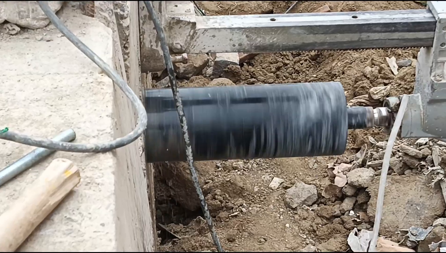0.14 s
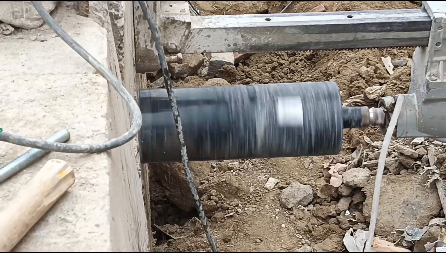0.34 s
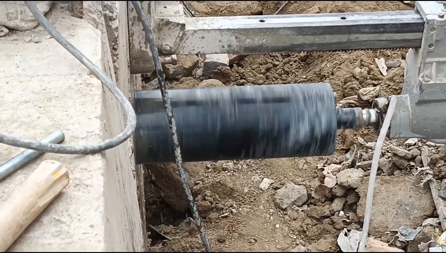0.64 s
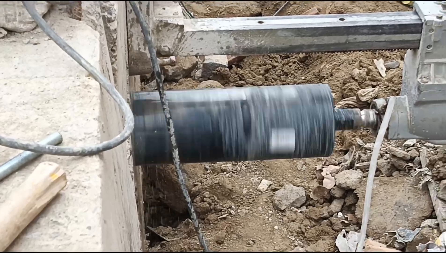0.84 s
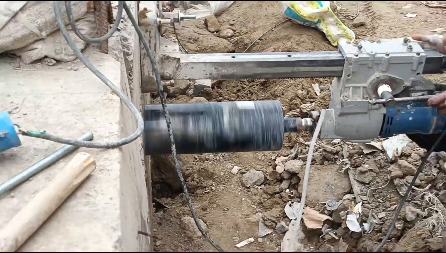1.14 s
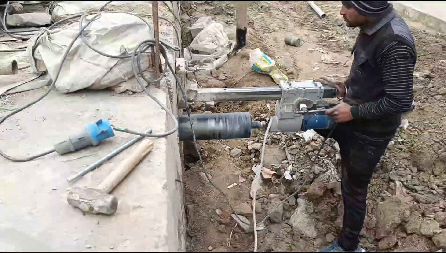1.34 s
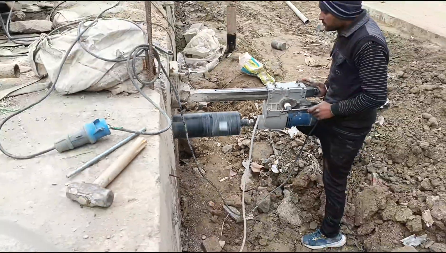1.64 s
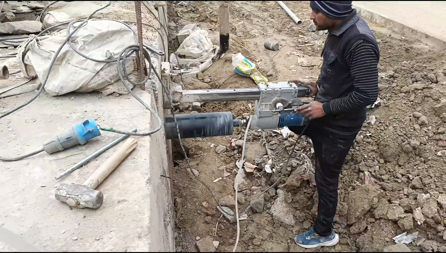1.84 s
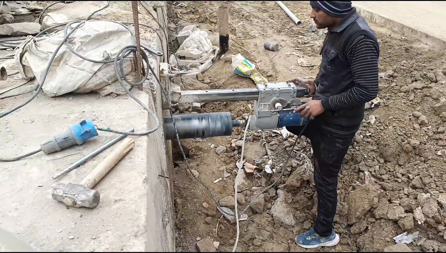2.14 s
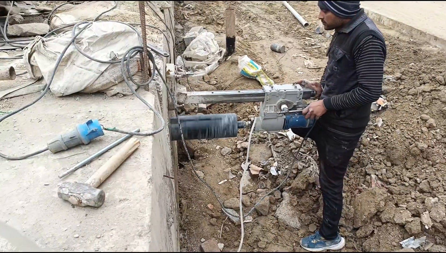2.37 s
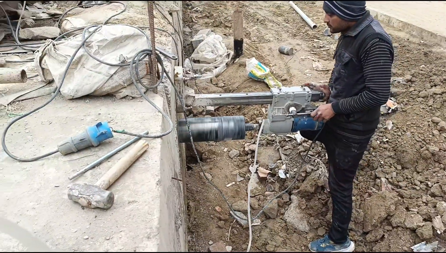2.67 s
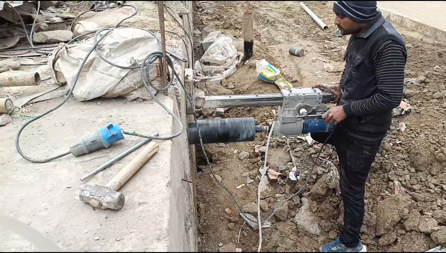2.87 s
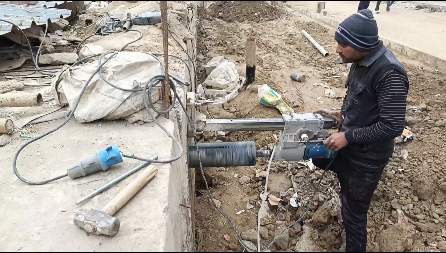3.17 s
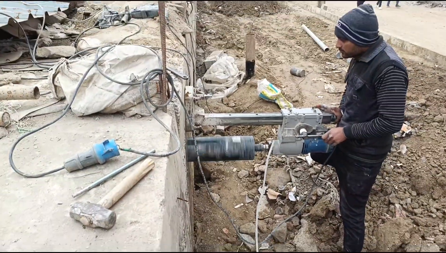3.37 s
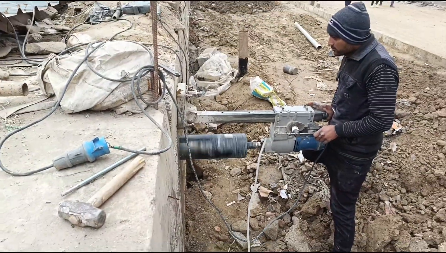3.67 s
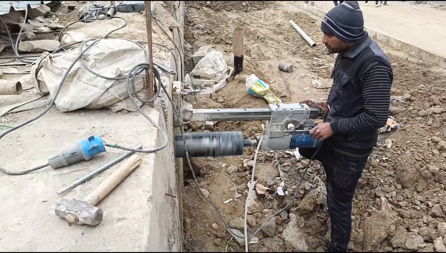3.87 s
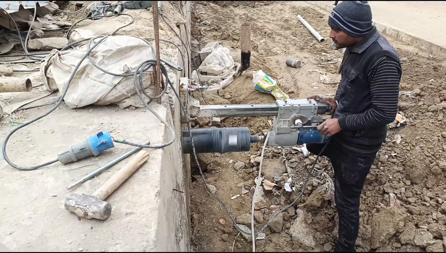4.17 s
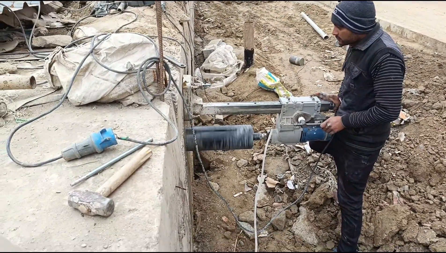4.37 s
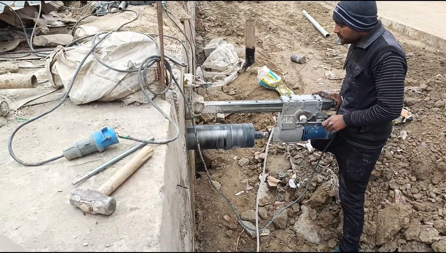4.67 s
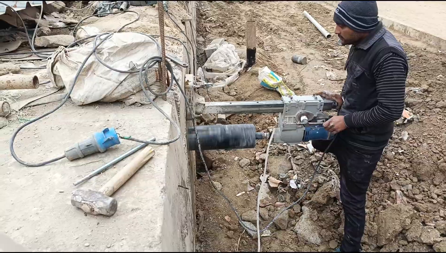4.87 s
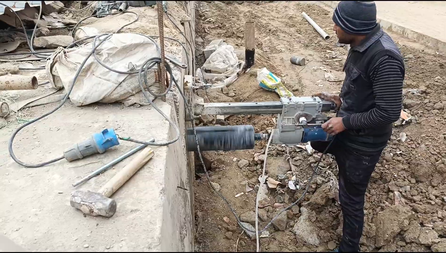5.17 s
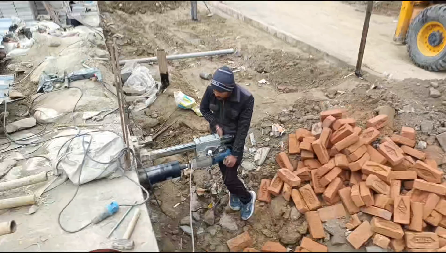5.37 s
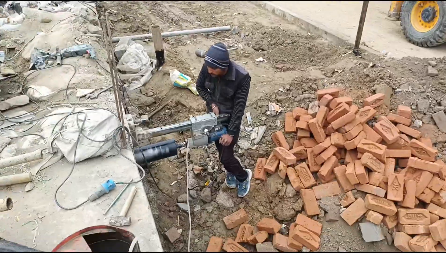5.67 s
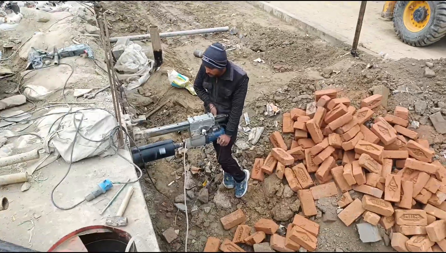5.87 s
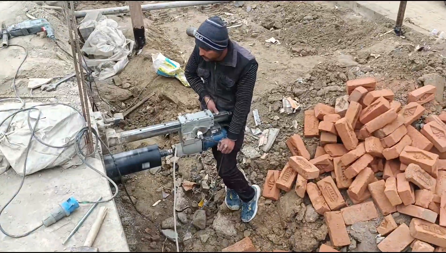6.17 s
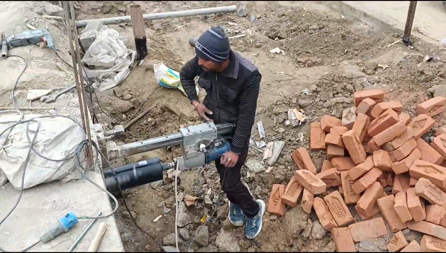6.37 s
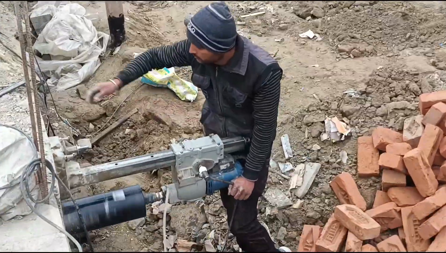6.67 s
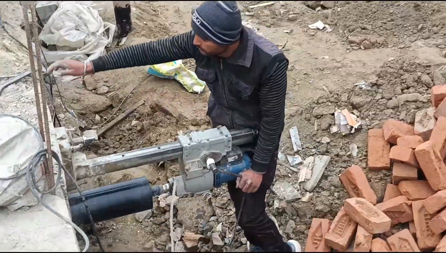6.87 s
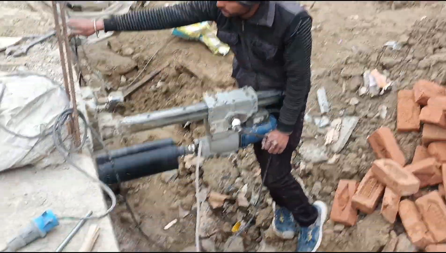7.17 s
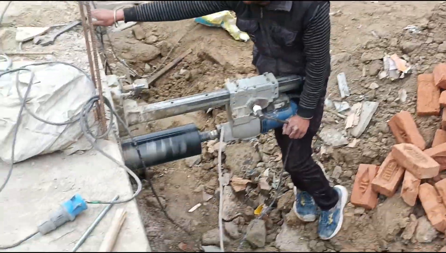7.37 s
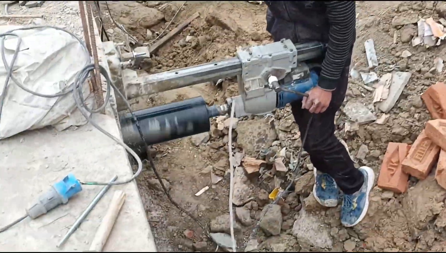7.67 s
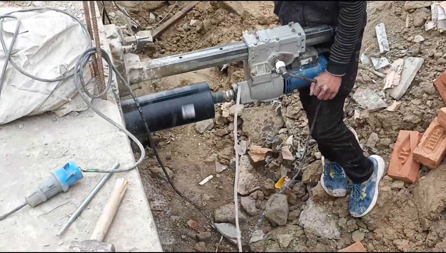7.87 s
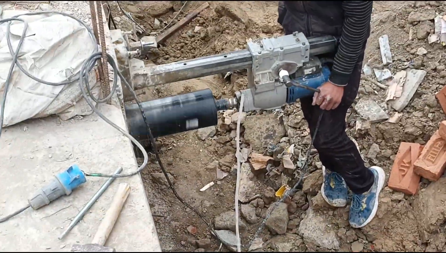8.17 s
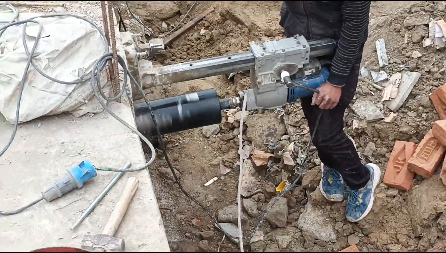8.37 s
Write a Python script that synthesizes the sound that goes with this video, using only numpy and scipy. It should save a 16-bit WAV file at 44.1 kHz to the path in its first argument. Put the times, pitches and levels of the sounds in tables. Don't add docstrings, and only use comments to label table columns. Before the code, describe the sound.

A continuous harsh, hissing grind of a steel barrel in concrete, close and dry in open air, pulsing slightly as it turns. Dull knocks hit the stand, more often toward the end of this part. A brief dropout follows, then the same drill from a more distant microphone position, without knocks, its gears whining while a diesel engine's low throb rises and eases.

```python
import sys
import numpy as np
from scipy import signal
from scipy.io import wavfile
from scipy.ndimage import uniform_filter1d

SR = 44100
rng = np.random.default_rng(int(sys.argv[2]) if len(sys.argv) > 2 else 0)


def materialize(psi):
    bounded = np.clip(np.atleast_2d(psi).T, -1, 1)
    quanta = np.round(bounded * 32767).astype(np.int16)
    wavfile.write(sys.argv[1], SR, quanta)


def boost_factor(decibels):
    exponent = np.asarray(decibels, float) / 20
    return 10 ** exponent


N = 376160

CUT_S, RESUME_S = 5.2715, 5.3355
TIME_S = np.arange(N) / SR
NEAR, FAR = TIME_S < CUT_S, TIME_S >= RESUME_S


def rms_one(x):
    return x / np.sqrt(np.mean(x ** 2) + 1e-20)


def in_time(rows):
    s, *columns = np.transpose(rows)
    return [np.interp(TIME_S, s, column) for column in columns]


def drift(rate):
    step = 40
    r = np.exp(-2 * np.pi * step * rate / SR)
    noise = rng.standard_normal(N // step + 2002)
    slow = signal.lfilter([1], [1, -2 * r, r * r], noise)[2000:]
    return np.interp(np.arange(N) / step, np.arange(len(slow)), rms_one(slow))


def resonate(x, hz, width):
    r = np.exp(-np.pi * width / SR)
    feedback = [1, -2 * r * np.cos(2 * np.pi * hz / SR), r * r]
    return signal.lfilter([(1 - r * r) / 2, 0, (r * r - 1) / 2], feedback, x)


def tone(hz, db, wander_hz, flutter_db):
    phase = 2 * np.pi * np.cumsum(hz + wander_hz * drift(27)) / SR
    return np.sqrt(2) * boost_factor(db + flutter_db * drift(17)) * np.sin(phase)


# start_s, firing_hz, effort_db
LOADER_REVS = [(5.4, 32.4, -34), (5.65, 36.2, -34), (5.9, 41.06, -32), (6.3, 41.7, -33), (6.5, 39.0, -34),
               (6.6, 34.7, -40), (6.7, 38.27, -26), (6.85, 40.4, -30), (7.0, 43.9, -26), (7.3, 46.1, -23.5),
               (7.6, 46.3, -29), (8.0, 46.3, -34), (8.45, 45.5, -36)]
# pitch_hz, level_db
EXHAUST_PIPE = [(45, -23), (63, -12), (73, 6.5), (83, -10), (95, 2.5), (136, -11), (164, 2), (186, -12)]


def loader():
    firing_hz, effort_db = in_time(LOADER_REVS)
    pipe_hz, pipe_db = np.transpose(EXHAUST_PIPE)
    engine = 0
    for multiple in (1, 2, 3, 4):
        hz = multiple * firing_hz
        passed_db = np.interp(np.log(hz), np.log(pipe_hz), pipe_db)
        engine = engine + tone(hz, effort_db + passed_db, wander_hz=0.7, flutter_db=1.8)
    return engine


# start_s, commutator_hz, level_db
NEAR_WHINE = [(.0, 12870, -45), (.29, 12930, -46), (.33, 13390, -54), (.66, 13316, -35), (.8, 13149, -33.5),
              (1.1, 13047, -31), (1.6, 12915, -36), (2.05, 12862, -39), (2.4, 12980, -41),
              (2.75, 13121, -35), (3.08, 13080, -35), (3.3, 13070, -49), (3.8, 13066, -48),
              (3.95, 13064, -38.5), (4.3, 13035, -43), (4.6, 12961, -38.5), (5.2, 12930, -37.5)]
# start_s, gear_mesh_hz, mesh_db, commutator_db
FAR_WHINE = [
    (5.5, 994, -30.5, -70),
    (5.92, 982, -29, -64),
    (6.08, 987, -25.5, -70),
    (6.35, 1000, -30, -72),
    (6.55, 1012, -29, -55),
    (6.95, 1023, -35.5, -58),
    (7.4, 1022, -32.5, -51),
    (7.8, 1018, -35.5, -55),
    (8.02, 1009, -24, -57),
    (8.3, 1005, -31, -64),
]
BARS_PER_TOOTH = 10.97


def motor():
    bar_hz, bar_db = in_time(NEAR_WHINE)
    mesh_hz, mesh_db, far_bar_db = in_time(FAR_WHINE)
    close = tone(bar_hz, bar_db, wander_hz=8.0, flutter_db=2.5)
    far = tone(mesh_hz, mesh_db, wander_hz=4.5, flutter_db=2.2)
    far += tone(BARS_PER_TOOTH * mesh_hz, far_bar_db + 1, wander_hz=30.0, flutter_db=2.2)
    return np.where(NEAR, close, far)


def speed(rows):
    hz = in_time(rows)[0]
    return 100 * (hz / np.mean(np.array(rows)[:, 1]) - 1)


# start_s, peak_db
KNOCK_TIMES = [(0.642, -19), (0.923, -19), (1.289, -24), (1.719, -38), (2.053, -31), (2.187, -30),
               (2.438, -19), (2.571, -40), (2.646, -29), (2.776, -13.5), (2.969, -45), (3.368, -32),
               (3.537, -24), (3.679, -16), (3.817, -30), (3.929, -32), (4.063, -19), (4.189, -18.5),
               (4.319, -19), (4.469, -15), (4.619, -21), (4.86, -20), (4.988, -20), (5.131, -15.5),
               (5.258, -17.5)]
# pitch_hz, width_hz, level_db
STAND_MODES = [
    (191, 44, 0.4),
    (390, 66, 0.1),
    (574, 90, -1.5),
    (865, 170, -2),
    (1130, 80, -9.0),
]


def stand_ring(x):
    ringing = 0
    for hz, width, db in STAND_MODES:
        twice = resonate(resonate(x, hz, width), hz, 2 * width)
        ringing = ringing + boost_factor(db) * twice / np.sqrt(width)
    return ringing


def knocks(rise_s=0.0021, fall_s=0.012, level_db=-3.5):
    t = np.arange(SR // 4) / SR
    shove = (1 - np.exp(-t / rise_s)) * np.exp(-t / fall_s)
    marks = np.zeros(N)
    marks[[round(s * SR) for s, db in KNOCK_TIMES]] = boost_factor(np.array(KNOCK_TIMES)[:, 1] + level_db)
    rough = rng.standard_normal(N)
    scrape = 0.53 * rough * signal.fftconvolve(marks, shove / shove.max())[:N]
    contact = 14 * np.roll(marks, round(rise_s * SR))
    return stand_ring(scrape + contact) / np.std(stand_ring(rough))


def bites(db_per_db=0.14, lasts_s=0.019):
    t = np.arange(0, N, 40) / SR
    s, db = np.transpose(KNOCK_TIMES)
    strength = np.clip(db + 23.5, 0, None)
    surge = strength @ np.exp(-((t - s[:, None]) / lasts_s) ** 2)
    return db_per_db * np.interp(TIME_S, t, surge)


CONTROL_PITCHES = [80, 400, 1800, 5000, 9000, 14000]
GROUP_PITCHES = [400, 1100, 2500, 3900, 5300, 9000]
TURNS_PER_S = 7.6
BUMP_S, BUMP_LASTS_S, BUMP_DB = 2.975, 0.035, 18


def grinding(part, cut, answers, colour, hiss, modes, rings, scrape_db, hiss_db, patchy_db, wobble_db):
    feed_waver_db = 0.71
    grit_db = (in_time(cut)[0] + bites() + feed_waver_db * drift(1.67))[part]
    bite = grit_db - uniform_filter1d(grit_db, size=SR // 4)
    site, stand, body, grit_shift, fan, brush, *reach = answers[:, part] + 1.38 * bite
    site = site + 2.5 * drift(4.0)[part]
    site = site + BUMP_DB * np.exp(-((TIME_S[part] - BUMP_S) / BUMP_LASTS_S) ** 2)
    stand = stand + 1.7 * drift(9)[part]
    grit_level = grit_db - np.mean(grit_db) + grit_shift - 1.44 * bite
    levels = np.array([site, stand, body, grit_level, fan, brush])
    groups = np.array([stand, *reach, fan])
    turn = 2 * np.pi * np.cumsum(TURNS_PER_S + 0.72 * drift(0.96))[part] / SR
    pressure = boost_factor(0.45 * drift(54)[part])
    grit = rng.standard_normal((4, N))[:, part] * pressure

    def swell(hz, centres_hz=CONTROL_PITCHES, levels=levels):
        share = np.array([np.interp(np.log(hz), np.log(centres_hz), row) for row in np.eye(6)])
        once = np.cos(turn + rng.uniform(0, 0.5))
        twice = 1.37 * np.cos(2 * turn + rng.uniform(0, 4.7))
        patches = (0.6 * drift(1.66) + 0.84 * drift(22.7))[part]
        return share @ levels + wobble_db * (once + twice) + patchy_db * patches

    def banded(spectrum, edges):
        hz_points, db_points = np.transpose(spectrum)
        out = 0
        for k, (low, high) in enumerate(zip(edges, edges[1:])):
            hz = np.sqrt(low * high)
            band_filter = signal.butter(2, [low, high], "band", fs=SR, output="sos")
            band = signal.sosfilt(band_filter, grit[k % 2])
            db = np.interp(np.log(hz), np.log(hz_points), db_points)
            out = out + band * boost_factor(db + swell(hz))
        return rms_one(out)

    scrape = banded(colour, np.r_[np.geomspace(30, 950, 18), np.geomspace(1000, 7600, 36)])
    scrape = signal.sosfilt(signal.butter(4, 8000, fs=SR, output="sos"), scrape)
    air = banded(hiss, np.geomspace(7600, 16500, 18))
    ground_echo = 0.22 * np.roll(air, round(0.0031 * SR))
    air = air + ground_echo
    air = air + 0.2 * (np.roll(air - ground_echo, round(0.0073 * SR)))
    barrel = 0
    for k, (hz, width, db) in enumerate(sorted(modes + rings)):
        ring = resonate(resonate(grit[2 + k % 2], hz, width), hz, 4 * width)
        listener_shift = 1.4 * drift(5.0)[part]
        barrel = barrel + rms_one(ring) * boost_factor(db + swell(hz, GROUP_PITCHES, groups) + listener_shift)
    out = np.zeros(N)
    out[part] = boost_factor(np.mean(grit_db)) * (boost_factor(scrape_db) * scrape + barrel) + boost_factor(hiss_db) * air
    return out


# start_s, grit_db, angle (-1 side-on to 1 end-on)
FAR_FEED = [
    (5.56, -17.5, .2),
    (6.2, -18, 0.17),
    (6.6, -17.5, -0.67),
    (7.2, -20, 0.27),
    (7.6, -17, .2),
    (8.1, -15.5, 0.6),
    (8.53, -20, -0.7),
]
# pitch_hz, level_db per Hz
FAR_AIR = [(4470, -30), (7600, 8.5), (8230, 7), (10600, -13.5), (11000, -12), (11900, -22), (13600, -5),
           (14800, -8), (15400, 4.5)]
# pitch_hz, level_db per Hz
FAR_SCRAPE = [(40, -44), (81, -10.5), (227, -9), (419, -14), (694, -9), (1150, -8.5), (1990, -2.5),
              (2890, -5.5), (3900, -5), (4600, -5.5), (5200, -1.5), (6100, -1), (6900, -4.5), (7700, -15)]
# pitch_hz, width_hz, level_db relative to the grit
FAR_HOUSING = [(223.5, 52, -14.5), (529, 35, -17.5), (1995, 54, -22), (2370, 240, -22.5), (2367, 37, -16.5),
               (3926, 235, -8), (6040, 85, -52)]
# pitch_hz,
# width_hz, level_db relative to the grit
FAR_BARREL = [(985, 70, -15), (1220, 40, -25), (1630, 35, -20), (1785, 40, -19), (2654, 16, -21),
              (4100, 40, -20), (4260, 50, -21), (5185, 9, -19), (5315, 9, -24), (5272, 9, -22),
              (6369, 9, -23), (6790, 14, -26), (6890, 10, -25), (8733, 14, -40), (11410, 14, -50)]
# speed_db per % of motor speed, gain_db while gain is down, angle_db end-on
FAR_LAYERS = [
    (-1.5, -12, 4),
    (0.39, -10, .1),
    (0.37, -8.5, 0.3),
    (-0.79, -21.5, -2.2),
    (1.1, -11, 2),
    (1.4, -3, .1),
    (1.5, -11, .9),
    (2.1, -15, -9),
    (0.29, -12, -0.5),
    (0.89, -16, -13),
]


def far_grinding():
    recover_s = 0.19
    gain_down = np.clip(1 - (TIME_S - RESUME_S) / recover_s, 0, 1)
    answers = np.array(FAR_LAYERS) @ [speed(FAR_WHINE), gain_down, in_time(FAR_FEED)[1]]
    return grinding(FAR, FAR_FEED, answers, FAR_SCRAPE, FAR_AIR, FAR_HOUSING, FAR_BARREL,
                    scrape_db=2.5, hiss_db=-35.0, patchy_db=2.0, wobble_db=0.45)


# start_s, grit_db, angle (-1 side-on to 1 end-on)
NEAR_FEED = [(0.0, -14, -0.18), (.5, -16, -1.03), (.9, -15.5, -0.34), (1.25, -12, 0.37), (1.9, -14, 0.32),
             (2.5, -13.5, 0.31), (2.8, -14.5, -0.56), (3.45, -13, 0.85), (3.8, -15, 0.35), (4.1, -13, -0.2),
             (4.6, -15, 0.28), (5.26, -14, -0.081)]
# pitch_hz, level_db per Hz
NEAR_AIR = [(4470, -30), (7600, -9.5), (8260, -11.5), (9380, -10), (11600, -17), (12900, -9.5),
            (13800, -18), (14900, 1.5), (15400, -3)]
# pitch_hz, level_db per Hz
NEAR_SCRAPE = [(40, -40), (150, -21.5), (320, -22.5), (660, -21), (1260, -14.5), (2400, -15), (3400, -16.5),
               (3750, -10.5), (4700, -4), (4950, -9.5), (5400, -3.5), (6300, -7.5), (7300, -10),
               (7700, -32)]
# pitch_hz, width_hz, level_db relative to the grit
NEAR_HOUSING = [(200.5, 25, -27.5), (377.6, 21, -28), (424, 185, -21), (883, 28, -25), (1006, 37, -23.5),
                (1423, 18, -24), (1930, 100, -21), (2100, 20, -26.5), (2766, 125, -18.5), (4065, 21, -22.5),
                (4260, 300, -12), (4440, 130, -34), (5520, 73, -14), (8940, 580, -24.5)]
# pitch_hz, width_hz, level_db relative to the grit
NEAR_BARREL = [(1163, 35, -21), (1663, 20, -22), (2579, 14, -20), (2644, 16, -22), (3270, 30, -30),
               (3764, 16, -18), (3850, 12, -16), (3915, 16, -24), (5167, 14, -15), (5269, 14, -17),
               (5936, 22, -19), (6220, 25, -22), (6777, 16, -23), (6891, 16, -19), (7181, 16, -26),
               (9157, 30, -38), (10610, 25, -44), (10714, 25, -42), (11418, 25, -43)]
# speed_db per % of motor speed, turned_db once turned away, angle_db end-on
NEAR_LAYERS = [
    (3, -18, 3),
    (-1.8, -0.4, -1),
    (-0.2, -1, -1.2),
    (0.6, 1, -2.8),
    (-0.8, -1, -1.5),
    (1, -9.5, -0.5),
    (0.9, -2.3, 1.7),
    (-4, -2.2, -1.5),
    (1.2, 1, 6),
    (-0.6, 2.8, -5.5),
]


def near_grinding():
    turn_s, turn_lasts_s = 3.05, 0.16
    turned = np.clip((TIME_S - turn_s) / turn_lasts_s, 0, 1)
    steady_whine = NEAR_WHINE[2:]
    answers = np.array(NEAR_LAYERS) @ [speed(steady_whine), turned, in_time(NEAR_FEED)[1]]
    return grinding(NEAR, NEAR_FEED, answers, NEAR_SCRAPE, NEAR_AIR, NEAR_HOUSING, NEAR_BARREL,
                    scrape_db=-1.0, hiss_db=-28.5, patchy_db=1.77, wobble_db=0.5)


def scene():
    fade_in = np.clip((TIME_S - RESUME_S) / 0.044, 0, 1)
    mono = fade_in * loader()
    mono += (NEAR + fade_in) * motor()
    mono += NEAR * knocks()
    mono += far_grinding() + near_grinding()
    return np.array([mono, mono])


def roll_off(x):
    return signal.sosfilt(signal.butter(12, 16880, fs=SR, output="sos"), x)


def record(dry):
    soft = 1.05 * np.tanh(dry / 1.05)
    top_cut = signal.ellip(14, 0.3, 80, 15490, fs=SR, output="sos")
    finished = signal.sosfilt(top_cut, soft)
    return roll_off(finished)


dry = scene()
out = record(dry)
materialize(out)
```